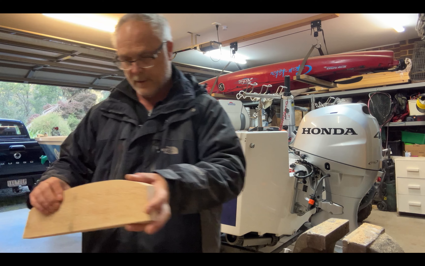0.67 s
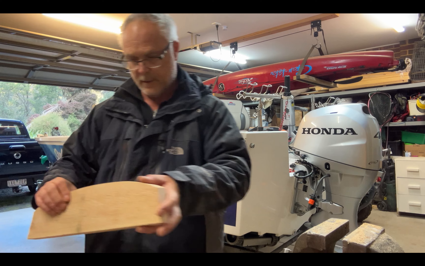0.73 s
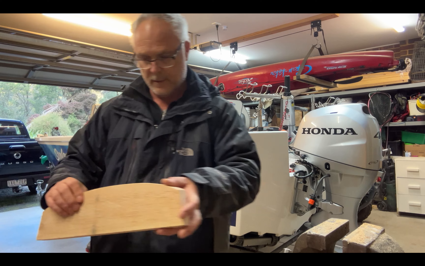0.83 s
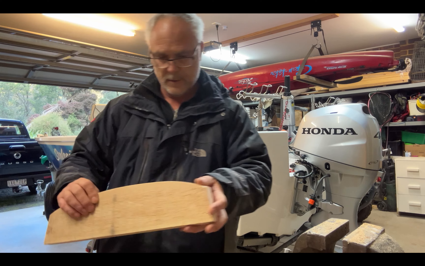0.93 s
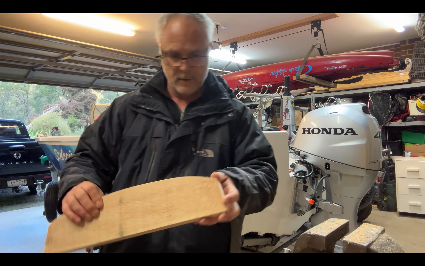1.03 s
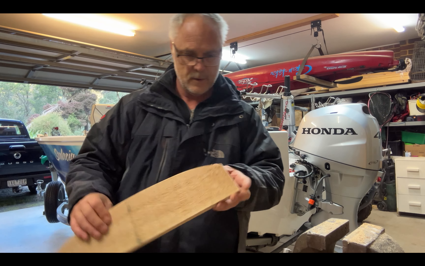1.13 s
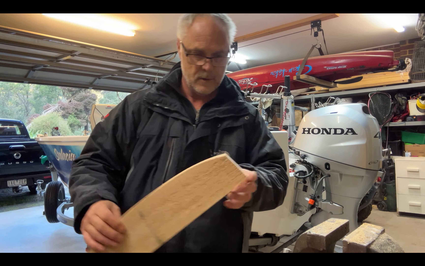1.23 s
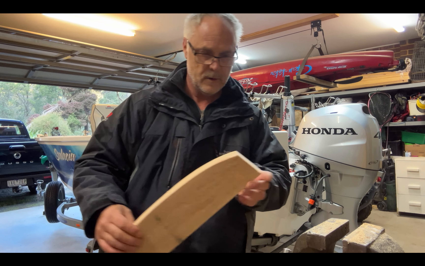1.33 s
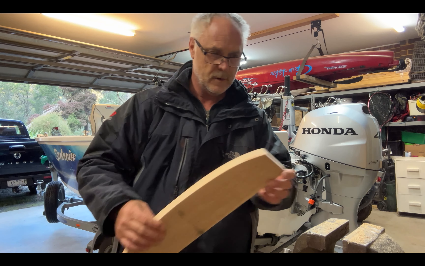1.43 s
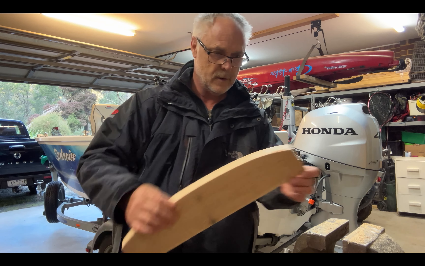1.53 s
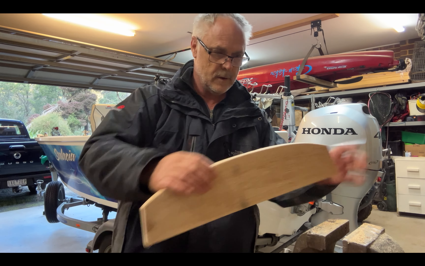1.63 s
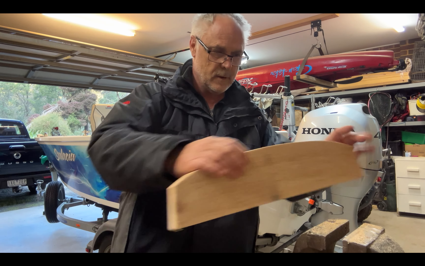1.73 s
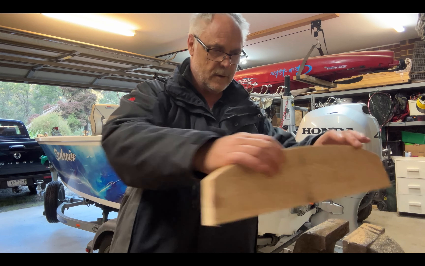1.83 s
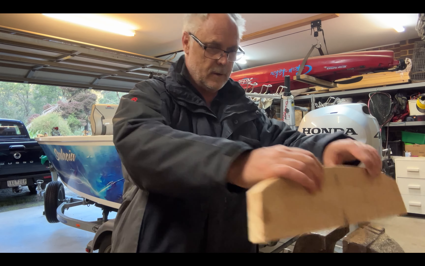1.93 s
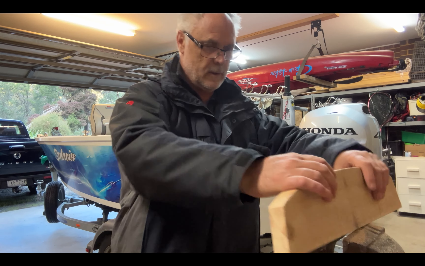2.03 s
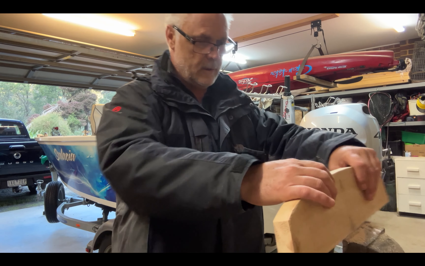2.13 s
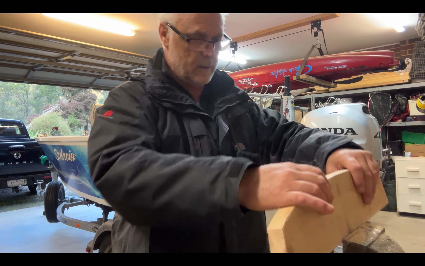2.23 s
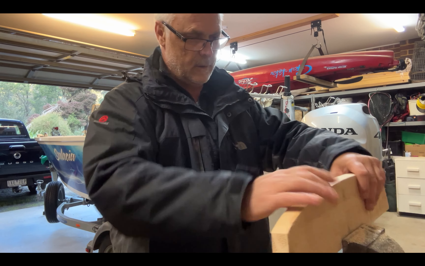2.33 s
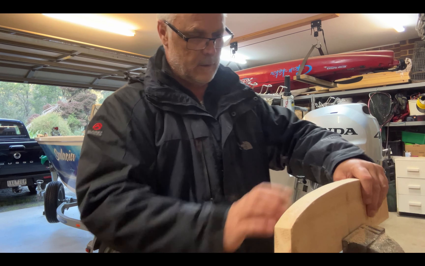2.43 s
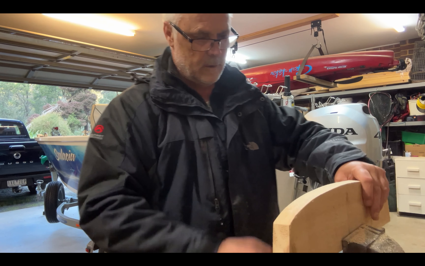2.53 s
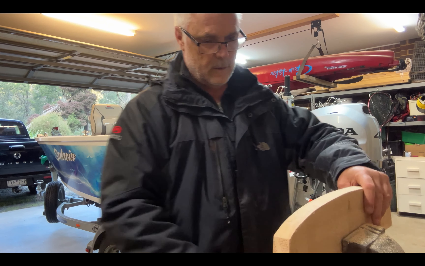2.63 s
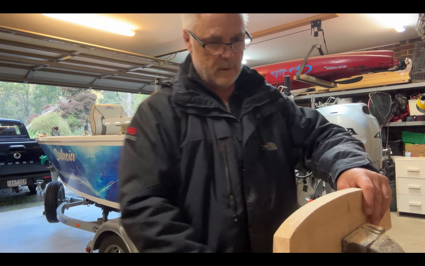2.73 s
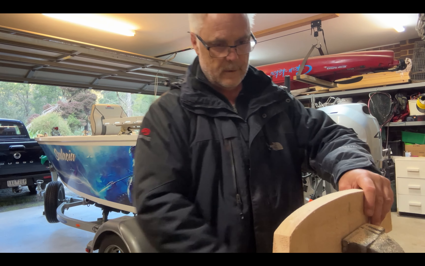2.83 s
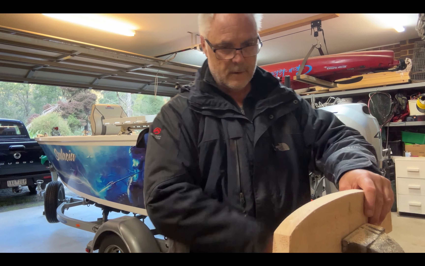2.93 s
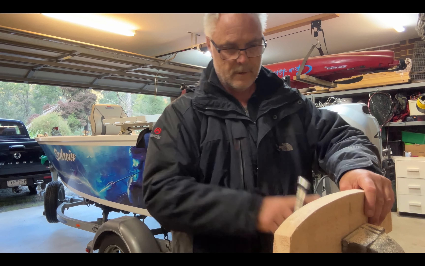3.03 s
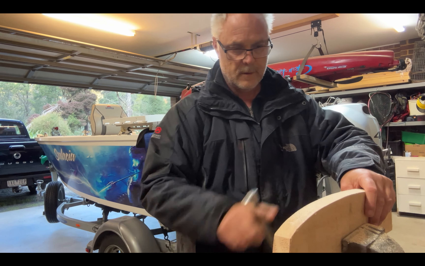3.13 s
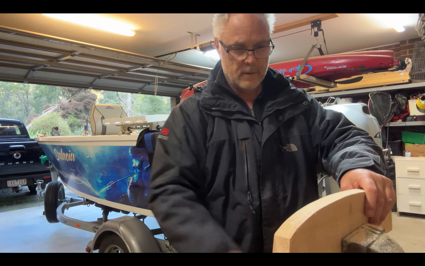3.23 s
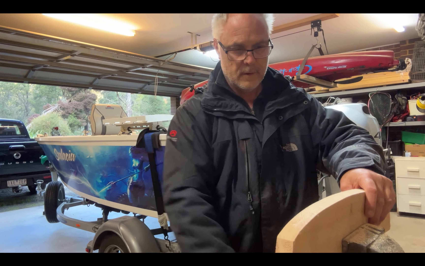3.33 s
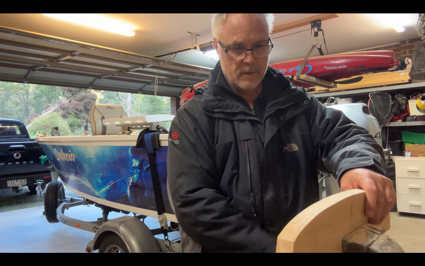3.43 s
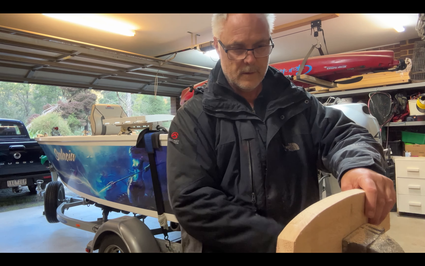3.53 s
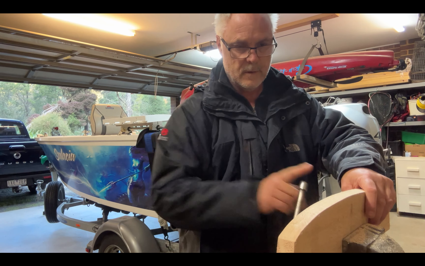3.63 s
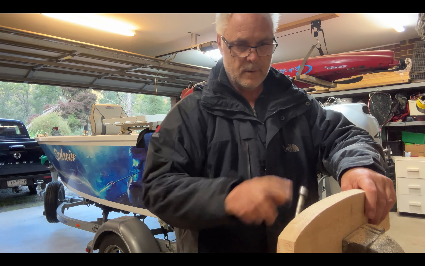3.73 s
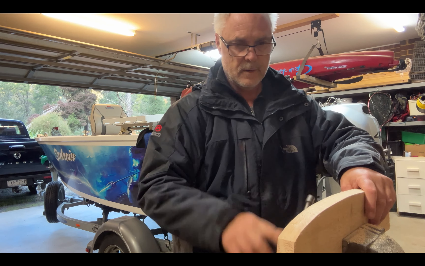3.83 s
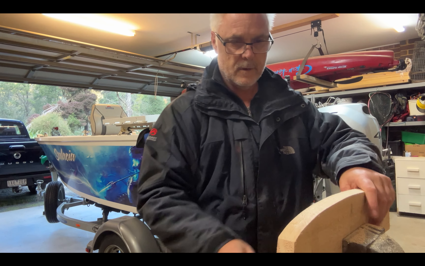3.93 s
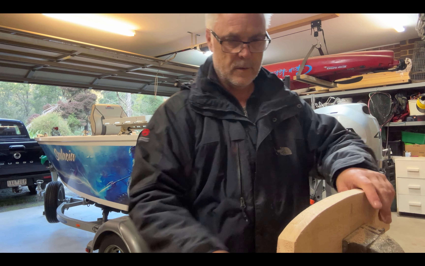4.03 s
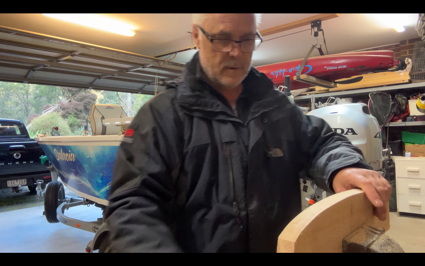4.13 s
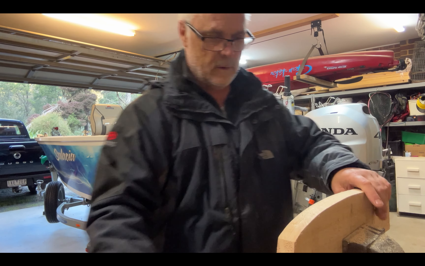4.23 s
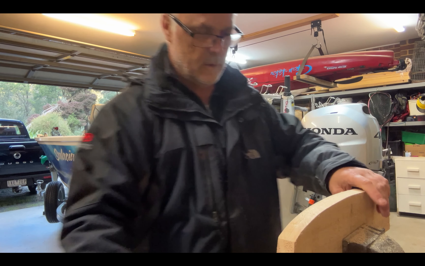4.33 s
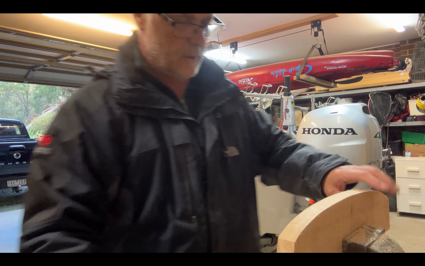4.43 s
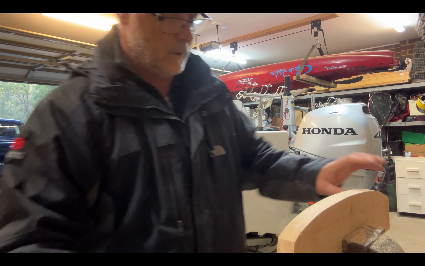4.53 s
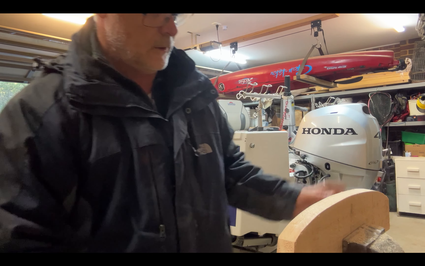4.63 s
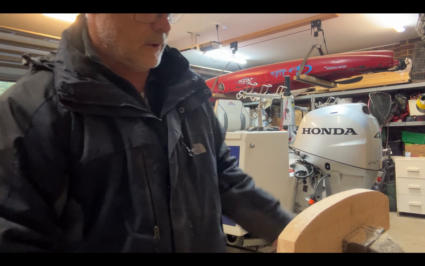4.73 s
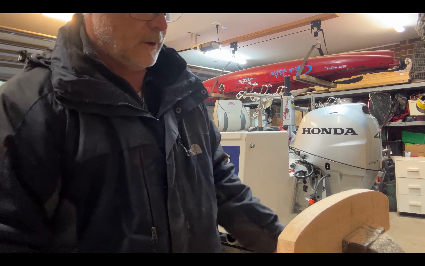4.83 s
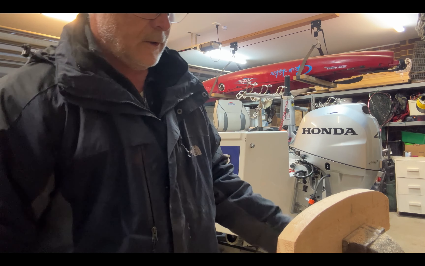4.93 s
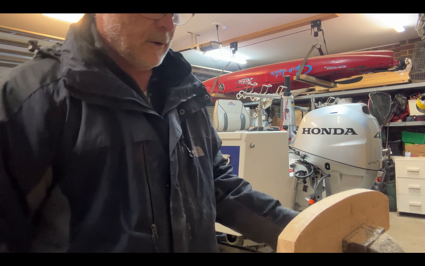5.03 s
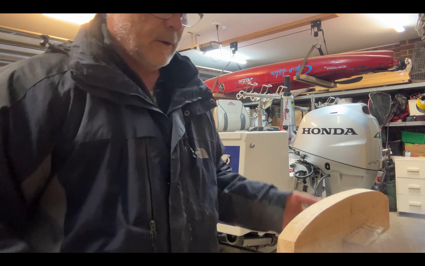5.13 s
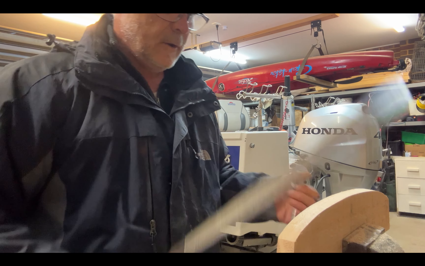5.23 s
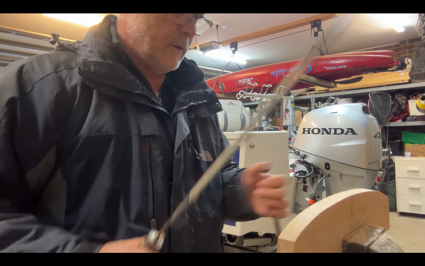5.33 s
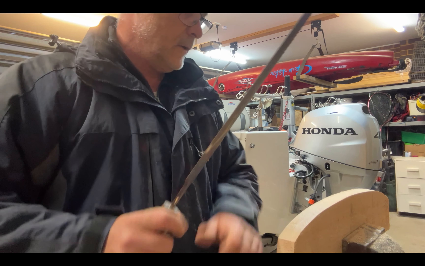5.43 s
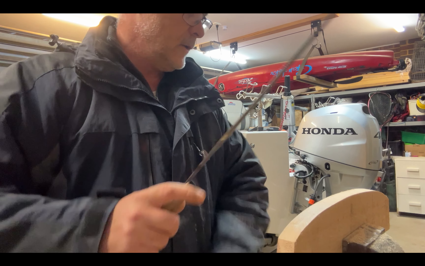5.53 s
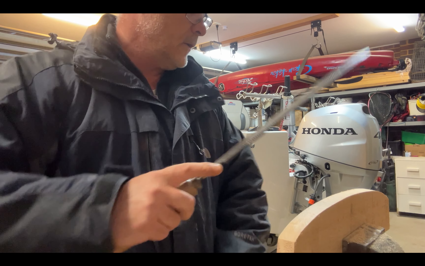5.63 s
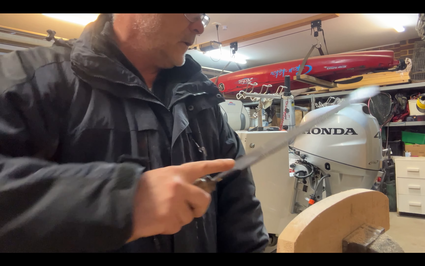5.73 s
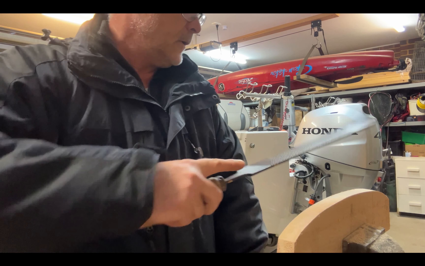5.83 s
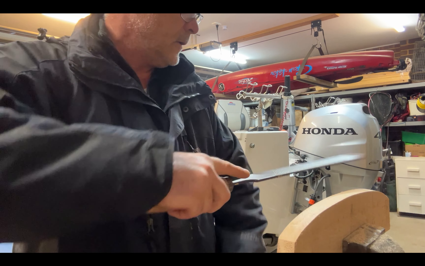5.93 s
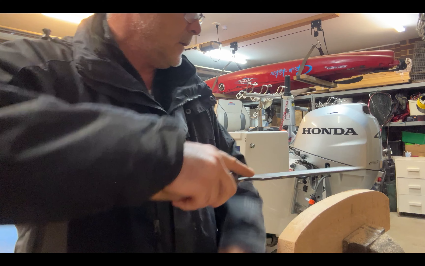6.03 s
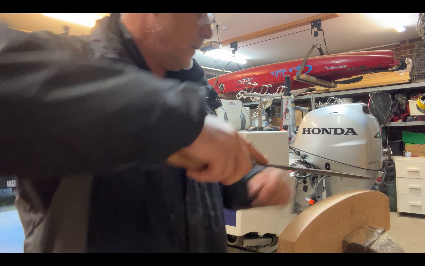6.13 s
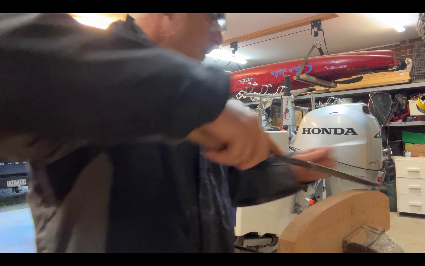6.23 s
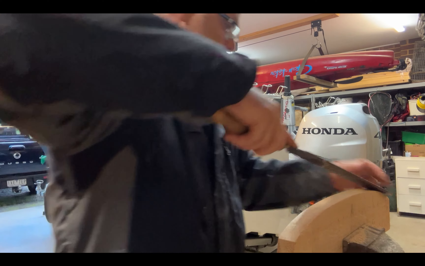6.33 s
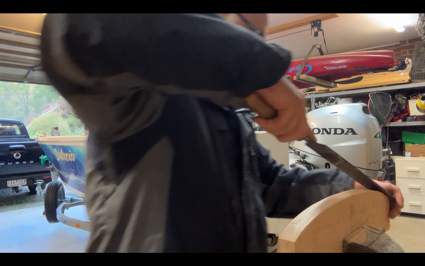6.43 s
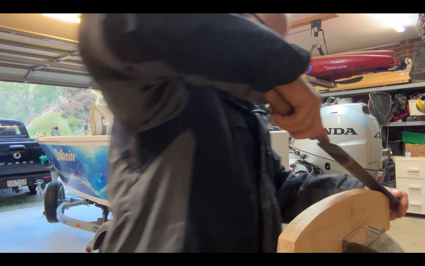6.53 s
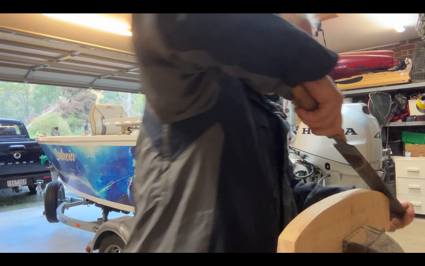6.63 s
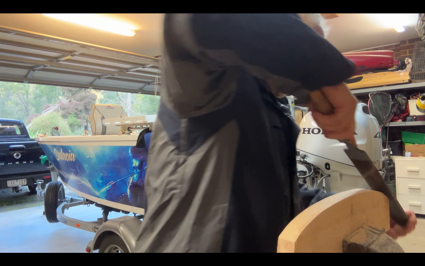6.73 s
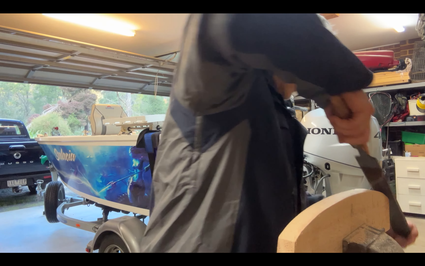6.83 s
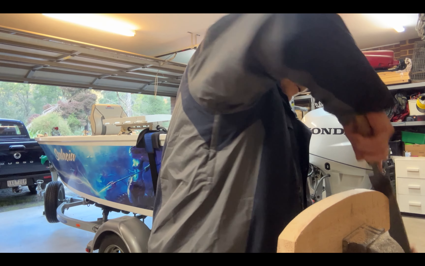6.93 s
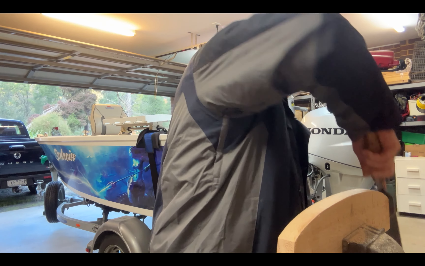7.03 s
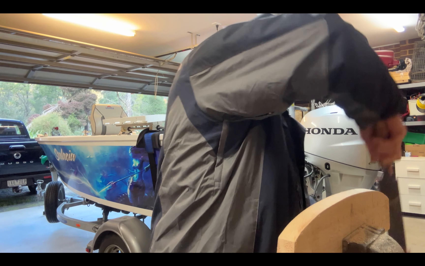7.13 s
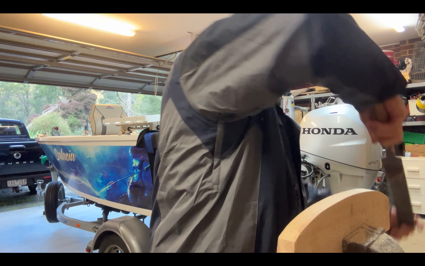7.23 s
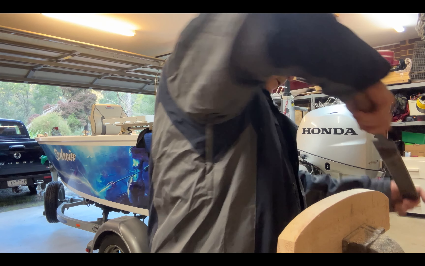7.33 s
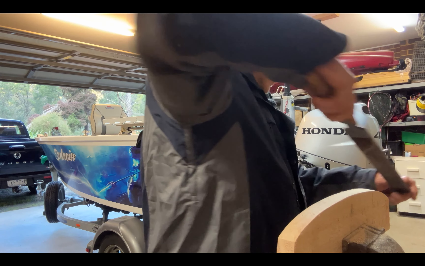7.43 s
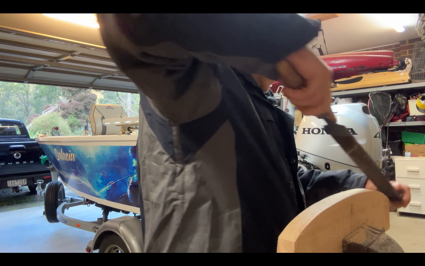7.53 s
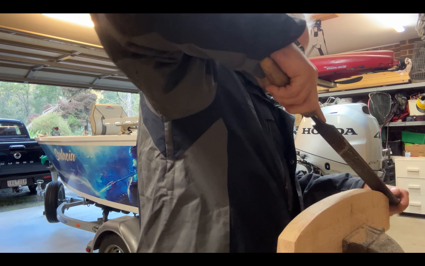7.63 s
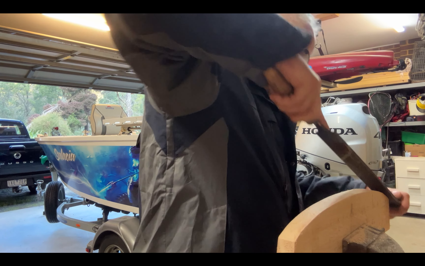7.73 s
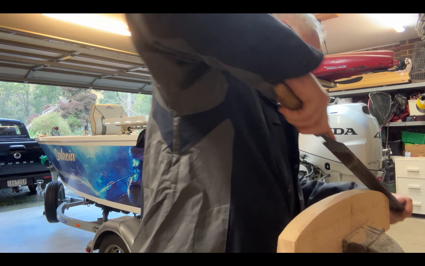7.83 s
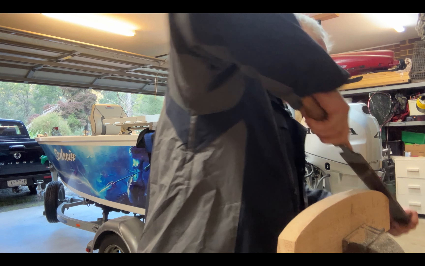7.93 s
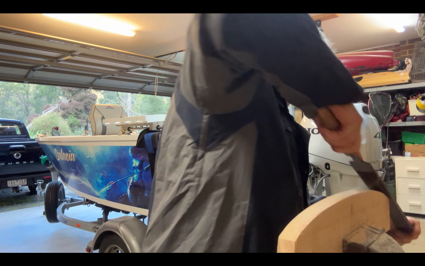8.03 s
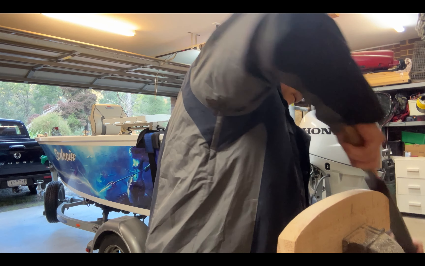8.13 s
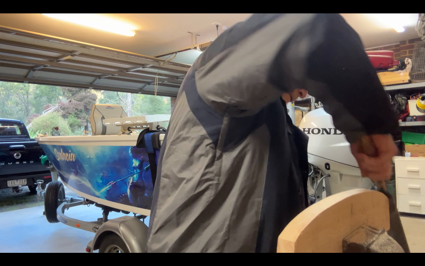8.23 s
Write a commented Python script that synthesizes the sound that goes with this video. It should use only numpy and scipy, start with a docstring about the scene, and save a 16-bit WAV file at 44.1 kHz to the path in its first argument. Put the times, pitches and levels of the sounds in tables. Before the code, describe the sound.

A timber board clacks into a steel vise with a ringing clank, screw thumps and clinks follow, then two harsh file strokes rasp along wood.

```python
"""In a garage a man in a nylon jacket, hissing and rustling as he moves, slides his palm along a curved board.
The board lands in a bench vise with a clack and a bounce; the slack jaw clanks, the screw thumps as it is
wound, steel clinks and the jolted bench booms. With a coarse file he then makes two strokes along the edge:
snags excite resonances of the clamped board, snapping fibres crackle and ring the blade, and the file judders.
Noise, clicks and short blows drive the resonators; most sources get a garage tail, over faint steady air."""
import sys
import numpy as np
from scipy import signal
from scipy.fft import rfft, irfft, next_fast_len
from scipy.io import wavfile
from scipy.ndimage import uniform_filter1d, map_coordinates

SR = 44100
rng = np.random.default_rng(int(sys.argv[2]) if len(sys.argv) > 2 else 0)


def master(y):
    """Save y as 16-bit WAV."""
    cut = np.clip(np.atleast_2d(y).T, -1, 1)
    pcm = np.round(cut * 32767)  # scale
    wavfile.write(sys.argv[1], SR, pcm.astype(np.int16))


N = 365588
TIME = np.arange(N) / SR


def from_db(db):
    """Decibels to gain."""
    return np.exp(np.log(10) / 20 * np.asarray(db))


def rms_one(x):
    """Scale to an rms of 1."""
    return x / np.sqrt(np.mean(x ** 2) + 1e-20)


def at_peak(sound, db):
    """Scale a single hit so that its peak has this level."""
    return from_db(db) * sound / np.abs(sound).max()


def bandpass(x, order, low_hz, high_hz):
    """Keep the band between two frequencies."""
    return signal.sosfilt(signal.butter(order, [low_hz, high_hz], "band", fs=SR, output="sos"), x)


def lowpass(x, order, top_hz):
    """Take the treble off."""
    return signal.sosfilt(signal.butter(order, top_hz, fs=SR, output="sos"), x)


def at_hz(points, hz):
    """Read a table on a log-frequency axis."""
    f, value = np.transpose(points)
    return np.interp(np.log(hz + 1), np.log(f), value)


def colour(x, spectrum):
    """Give a steady texture a spectrum; rms 1."""
    size = next_fast_len(N)
    hz = np.fft.rfftfreq(size, 1 / SR)
    beyond_last = np.minimum(1, spectrum[-1][0] / (hz + 1))
    shape = from_db(at_hz(spectrum, hz)) * beyond_last
    return rms_one(irfft(rfft(x, size) * shape, size)[..., :N])


def drift(per_s):
    """Smooth chance, with an rms of 1 and this many random turns per second."""
    knots = rng.standard_normal(N // 16)
    return rms_one(np.interp(TIME * per_s, np.arange(len(knots)), knots))


def resonate(x, modes):
    """Parallel resonances of alternating sign."""
    out = 0
    for k, (hz, width, db) in enumerate(modes):
        r = np.exp(-np.pi * width / SR)
        rung = signal.lfilter([1, 0, -1], [1, -2 * r * np.cos(2 * np.pi * hz / SR), r * r], x + 1e-18)
        out = out + rung * (1 - r * r) / 2 * from_db(db) * (-1) ** k
    return out


def grains(per_s, spread_db):
    """Random clicks of either sign; at a spread of 0 dB all are equally big."""
    sizes = from_db(spread_db * np.minimum(rng.exponential(1, N), 4)) * rng.choice([-1, 1], N)
    return sizes * (rng.random(N) < per_s / SR)


def rattle(length_s):
    """A blow that breaks up into a dying buzz of tiny contacts, about equally strong at all frequencies."""
    t = TIME[:SR // 3]
    buzz = rng.standard_normal(len(t)) * np.exp(-t / length_s)
    for _ in range(4):   # flatten the spectrum, then keep the buzz short
        spectrum = rfft(buzz)
        flat = irfft(spectrum / (np.abs(spectrum) + 1e-12), len(t))
        buzz = flat * np.exp(-(t / length_s / 10) ** 2)
    return buzz


def add(track, s, sound):
    """Mix a sound into a track at a time."""
    start = max(round(s * SR), 0)
    track[..., start:start + sound.shape[-1]] += sound[..., :N - start]


def wide(likeness):
    """White noise in two partly alike channels."""
    mid, side = rng.standard_normal((2, N))
    return np.sqrt(1 + likeness) * mid + np.sqrt(1 - likeness) * side * [[1], [-1]]


def detune(x, share, per_s):
    """Changing pressure and contact point pull all resonances up and down a little."""
    clock = TIME + np.cumsum(share * drift(per_s)) / SR
    return np.array([map_coordinates(channel, [clock * SR], order=1, mode="mirror") for channel in x])


def swell(s, spread):
    """A movement speeds up and slows down again: a bell in time, 1 on top."""
    return np.exp(-.5 * np.minimum(((TIME - s) / spread) ** 2, 60))


def swells(rows):
    """Gain of overlapping movements (s, spread s, dB); their powers add."""
    return np.sqrt(sum((from_db(db) * swell(s, spread)) ** 2 for s, spread, db in rows))


def held(start, end, rise_s, fall_db_per_s):
    """Attack, hold and a steady fall in dB."""
    return np.clip((TIME - start) / rise_s, 0, 1) * from_db(-fall_db_per_s * np.maximum(TIME - end, 0))


# The two file strokes. Each row: start in seconds, end in seconds, final effort in dB, swell in dB per second,
# time to bite in seconds, extra board shudder in dB.
FILE_STROKES = [(6.301, 7.02, -0.5, 39.5, 0.0056, 5), (7.729, 8.22, -0.5, 15, 0.16, 8.5)]


def effort(fall_db_per_s, build=1):
    """The file bites, is pushed ever harder to the end of each stroke and lets go; one gain curve per stroke."""
    curves = []
    for start, end, db, swell_db_per_s, bite_s, _ in FILE_STROKES:
        push = from_db(db - swell_db_per_s * np.maximum(end - TIME, 0))
        curves.append(push * held(start, end, build * bite_s, fall_db_per_s))
    return np.array(curves)


# Garage reverberation. Each row: frequency in Hz, time to fall by 60 dB in seconds.
GARAGE_DECAY = [(60, 0.54), (150, 0.58), (500, 0.5), (1500, 0.26), (3500, 0.33), (10000, 0.28)]


def garage(x, lag_s, pan_db, wet_db):
    """Direct sound, later on the left by lag_s, plus a diffuse tail whose bass lasts longest; pan_db > 0 is left."""
    x = np.broadcast_to(x, (2, N))
    t = TIME[:SR * 2 // 3]
    edges = np.geomspace(40, 18000, 10)
    tail = 0
    for low, high in zip(edges, edges[1:]):
        hz = np.sqrt(low * high)
        mid, side = rng.standard_normal((2, len(t)))
        noise = mid + min(1, hz / 600) * side * np.array([[1], [-1]])   # long waves reach both sides alike
        band = bandpass(noise, 2, low, high)
        decay = from_db(-60 * t / at_hz(GARAGE_DECAY, hz)) * (t > .003)
        tail = tail + band * decay / np.linalg.norm(decay) / noise.std()
    direct = np.array([np.interp(TIME - lag_s, TIME, x[0]), x[1]])
    heard = direct + from_db(wet_db) * signal.oaconvolve(x, tail, axes=1)[:, :N]
    return heard * from_db([[pan_db / 2], [-pan_db / 2]]) / np.hypot(1, from_db(wet_db))


# Spectrum of the open garage's air. Each row: frequency in Hz, relative level in dB.
AIR_SPECTRUM = [(25, -13), (65, 11.5), (120, 2), (250, -4.5), (500, -5.5), (900, -7), (1600, -5.5),
                (3000, -12.5), (7000, -17), (10500, -27), (13000, -23), (14000, -60)]


def air(level_db=-62):
    """The faint air of the garage: steady wide noise, strongest in the bass."""
    return from_db(level_db) * colour(wide(0.53), AIR_SPECTRUM)


# The whole bench jolted on its legs. Each row: time in seconds, relative boom level in dB, boom pitch in Hz,
# relative drumming level of its top in dB.
BENCH_JOLTS = [(2.014, -26, 74, -35.5), (2.224, -24, 67.4, -44.5), (2.715, -28, 70.3, -48.5),
               (3.036, -26.5, 58.6, -46.5), (3.358, -42, 57.6, -49.5), (3.785, -57, 59.6, -55),
               (4.938, -32.5, 54.4, -50), (5.277, -32.5, 144, -54.5), (5.501, -30.5, 59.4, -50),
               (6.004, -46, 66.6, -51.5), (7.652, -31.5, 60.5, -45), (8.265, -26, 62, -33)]
# He leans on the bench. Each row: start in seconds, end in seconds, level in dB.
BENCH_LEANING = [(2.067, 3.81, -40.5), (4.628, 7.533, -46.5)]
# Spectra of the swaying frame and the drumming top. Each row: frequency in Hz, relative level in dB.
SWAY_SPECTRUM = [(15, -60), (26, -31), (36, -7), (48, -6.5), (55, -3), (63, -4), (73, 1.5), (92, -12.5),
                 (130, -9.5), (250, -20.5)]
DRUM_SPECTRUM = [(70, -23.5), (110, -14), (148, -4.5), (175, -13), (230, -26.5), (400, -22), (800, -73)]
JOLT_RISE_S = 0.015
DRUM_DECAY_DB_PER_S = 121
SWAY_PER_JOLT_DB, SWAY_DECAY_DB_PER_S = -11, 57   # the frame sways on after every jolt
SWAY_FILING_DB = -27.5   # and in step with the filing effort
SETTLE_DB_PER_S = 62


def bench(drum_db=19.0):
    """Jolts, filing and his weight make the bench sway on its frame; each jolt also sets its top drumming."""
    pushes = [from_db(SWAY_FILING_DB) * effort(SETTLE_DB_PER_S).sum(axis=0)]
    for start, end, db in BENCH_LEANING:
        pushes.append(from_db(db) * held(start, end, JOLT_RISE_S, SETTLE_DB_PER_S))
    drumming = 0
    for s, boom_db, _, top_db in BENCH_JOLTS:
        pushes.append(from_db(boom_db + SWAY_PER_JOLT_DB) * held(s, s, JOLT_RISE_S, SWAY_DECAY_DB_PER_S))
        drumming = drumming + from_db(top_db) * held(s, s, JOLT_RISE_S, DRUM_DECAY_DB_PER_S)
    sway = np.linalg.norm(pushes, axis=0) * colour(wide(0.92), SWAY_SPECTRUM)
    drum = from_db(drum_db) * drumming * colour(wide(0.74), DRUM_SPECTRUM)
    return (sway + drum) * from_db([[-1.4], [1.4]])


def jolts(level_db=5.0, t60_s=0.57, rise_s=0.0014):
    """A heavy push rocks the bench, which booms briefly: one decaying sine per jolt."""
    out, t = np.zeros(N), TIME[:SR]
    for s, db, hz, _ in BENCH_JOLTS:
        decay = from_db(db + level_db - 60 * t / t60_s)
        add(out, s, decay * (1 - np.exp(-t / rise_s)) * np.sin(2 * np.pi * hz * t))
    return out * from_db([[-1.5], [1.5]])


# Arm movements in the jacket. Each row: fastest moment in seconds, spread in seconds, relative swish in dB,
# relative fold rustle in dB.
SLEEVE_MOVES = [(0.1, 0.19, -61.5, -60), (0.69, 0.035, -67, -79), (1.08, 0.17, -66, -67.5),
                (1.8, 0.2, -62.5, -58.5), (2.27, 0.16, -67, -50), (2.62, 0.077, -53, -46),
                (2.85, 0.082, -55, -56), (3.015, 0.061, -45.5, -42), (3.42, 0.14, -58.5, -53),
                (3.645, 0.05, -43, -45.5), (4.03, 0.49, -69, -61.5), (4.751, 0.2, -65.5, -57.5),
                (5.03, 0.19, -59, -56.5), (5.471, 0.14, -50.5, -49.5), (5.574, 0.046, -39, -47),
                (5.749, 0.037, -39.5, -46.5), (6.018, 0.15, -56.5, -53), (6.28, 0.11, -64, -56.5),
                (7.46, 0.18, -65, -52.5), (7.65, 0.12, -51, -50.5)]
# Spectra of the hissing threads and the rustling folds. Each row: frequency in Hz, relative level in dB.
SWISH_SPECTRUM = [(1000, -7.5), (2300, -1.5), (3500, 2), (5000, 2.5), (7000, -5.5), (9500, -1.5),
                  (11500, -3), (13000, -1.5), (13700, -27), (15000, -48.5)]
FOLD_SPECTRUM = [(90, -24.5), (170, -1.5), (400, 2), (700, -1.5), (1100, -3), (1800, -5.5), (2800, -11),
                 (5000, -12.5)]


def jacket(swish_db=7.0, folds_db=6.0, crinkle_db=1.9, snaps_db=-4):
    """Nylon threads slip over each other in a hiss and creases snap, while the folds rustle lower down."""
    swish = swells((s, spread, db) for s, spread, db, _ in SLEEVE_MOVES)
    folds = swells((s, spread, db) for s, spread, _, db in SLEEVE_MOVES)
    crinkle = from_db(crinkle_db * drift(70))
    slips = rms_one(crinkle * grains(per_s=33000, spread_db=-3.5))
    snaps = from_db(snaps_db) * rms_one(crinkle * grains(per_s=350, spread_db=2.5))
    threads = from_db(swish_db) * swish * colour(slips + snaps, SWISH_SPECTRUM)
    cloth = from_db(folds_db) * folds * colour(crinkle * wide(0.13), FOLD_SPECTRUM)
    return garage(threads, lag_s=.000113, pan_db=-1.4, wet_db=-7) + cloth * from_db([[-1], [1]])


# Shoes, sleeves and the file scuffing. Each row: middle in seconds, relative level in dB, centre in Hz,
# spread in seconds.
SCUFF_SLIDES = [(0.06, -53, 2350, 0.064), (0.088, -43.5, 570, 0.0042), (2.59, -41, 1300, 0.01),
                (3.574, -49.5, 1610, 0.079), (4.893, -59.5, 1590, 0.26), (5.189, -43.5, 820, 0.017),
                (5.51, -38, 2360, 0.029), (5.521, -33.5, 1130, 0.0034), (5.569, -34, 2300, 0.0048),
                (5.612, -41, 1640, 0.012), (5.951, -44, 1420, 0.024), (6.034, -43, 3520, 0.0068),
                (7.655, -42, 7600, 0.0054), (7.812, -34, 7500, 0.0024), (7.872, -54, 8000, 0.004),
                (8.228, -24, 7950, 0.0057)]


def scuffs(width_share=0.37):
    """Short gritty slides, each swelling and fading in one broad band."""
    grit = grains(per_s=5100, spread_db=1.5)
    out = 0
    for s, db, hz, spread in SCUFF_SLIDES:
        narrowed = resonate(grit, [(hz, width_share * hz, 0)])
        scrape = rms_one(resonate(narrowed, [(hz, hz, 0)]))
        out = out + from_db(db) * swell(s, spread) * scrape
    return garage(out, lag_s=.0001, pan_db=-0.5, wet_db=-5.0)


# Palm sliding along the free board. Each row: fastest moment in seconds, spread in seconds, relative level in dB.
PALM_SLIDES = [(0.8, 0.033, -70.5), (1.03, 0.084, -53), (1.195, 0.024, -38.5)]
# Board held in the hands. Each row: frequency in Hz, width in Hz, relative level in dB, extra dB per dB of
# sliding speed.
FREE_BOARD_MODES = [(595, 3.5, 0, -0.1), (1090, 75, -6.5, 1), (1514, 25, 1, -0.17), (2330, 120, -13, -0.5),
                    (2730, 52, -10, 0), (2960, 110, -8.5, -0.5), (4000, 160, -13.5, -2.5),
                    (4230, 160, -11.5, -0.5), (5040, 180, -14, -2), (5850, 130, -11, 0.5),
                    (7400, 150, -12, 3)]


def palm(steady_s=0.049):
    """Skin dragging over the grain keeps the free board singing; each mode grows with speed at its own rate."""
    drag, speed, song = grains(per_s=6200, spread_db=-2.5), swells(PALM_SLIDES), 0
    for hz, width, db, steepness in FREE_BOARD_MODES:
        mode = resonate(drag, [(hz, width, 0)])
        power = uniform_filter1d(mode ** 2, int(steady_s * SR))
        steady = mode / np.sqrt(np.abs(power) + 1e-12)
        song = song + from_db(db) * (speed / speed.max()) ** max(1 + steepness, .5) * steady
    return garage(speed.max() * song / 2, lag_s=-0.000067, pan_db=-2.0, wet_db=-8.0)


# Board clamped to the bench. Each row: frequency in Hz, width in Hz, relative level in dB, left minus right in dB.
CLAMPED_MODES = [(137.5, 31.5, -3, -5), (172.7, 38, 0.5, 1), (244.4, 25, -1, -6), (287.3, 6.4, 0, 10),
                 (346, 38, -2, -6.5), (399, 42, 0, 5), (460.2, 11.9, 4.5, -8), (561.7, 40, -2, 4),
                 (605, 52, -6, 0.5), (681, 20, -3.5, 1), (746, 14, -10, -8.5), (867, 27, -7.5, -8),
                 (1101, 29, -21, -28), (1451, 23, -11, 0), (1600, 150, -20, -2), (2050, 100, -22.5, 13),
                 (2730, 71, -39, 3), (2880, 170, -24, -2)]
WANDER_PER_S = 16   # how often the travelling contact favours other modes


def board(force, wander_db=0):
    """The clamped board in stereo: every mode radiates its own way, and waxes and wanes if the contact travels."""
    out = 0
    for k, (hz, width, db, pan) in enumerate(CLAMPED_MODES):
        mode = resonate(force, [(hz, width, db)]) * (-1) ** k
        if wander_db:
            mode = mode * from_db(wander_db * drift(WANDER_PER_S))
        out = out + mode * from_db([[pan / 2], [-pan / 2]])
    return out


# Knocks on the board. Each row: time in seconds, relative peak in dB, contact brightness in Hz,
# contact length in seconds.
BOARD_KNOCKS = [(0.09, -34, 1900, 0.002), (0.324, -40, 516, 0.0056), (2.216, -12, 1100, 0.0042),
                (3.027, -15, 497, 0.0027), (3.351, -16.5, 404, 0.0022), (3.466, -25.5, 1430, 0.011),
                (3.974, -40, 1210, 0.0044), (4.325, -39.5, 685, 0.027), (4.917, -26.5, 850, 0.025),
                (5.114, -31.5, 303, 0.0035), (5.414, -25.5, 537, 0.039), (5.523, -24.5, 700, 0.005),
                (5.951, -32, 302, 0.022), (6.088, -37.5, 194, 0.0029), (6.322, -19.5, 1000, 0.0022),
                (6.326, -7.5, 423, 0.01), (6.417, -17, 563, 0.027), (7.638, -13.5, 390, 0.0071),
                (7.764, -24, 1594, 0.0043), (7.805, -14.5, 710, 0.021), (8.267, -9, 1100, 0.008)]


def knocks(crack_db=-15, crunch=0.26, press_share=0.56, hard_s=0.023, bass_share=0.052):
    """A click and a short crunch ring the clamped board; longer contacts click less and set in gradually."""
    out, t = np.zeros((2, N)), TIME[:SR // 3]
    for s, db, bright_hz, length in BOARD_KNOCKS:
        force = crunch * rng.standard_normal(len(t)) * np.exp(-t / length)
        force *= 1 - np.exp(-t / (press_share * length))
        force[0] += np.exp(-length / hard_s)
        force = bandpass(force, 2, bass_share * bright_hz, bright_hz)
        add(out, s, at_peak(board(force) + from_db(crack_db) * force, db))
    return garage(out, lag_s=0.0001, pan_db=-3.0, wet_db=-8.0)


# Steel handle and tools clinking. Each row: time in seconds, relative peak in dB, pitch of the contact in Hz,
# free ring in dB, rattle in seconds.
STEEL_CLINKS = [(3.205, -37, 8000, -11, 0.00085), (3.28, -41, 9000, -18, 0.0034),
                (3.465, -19, 9550, -8, 0.0023), (3.783, -26, 2970, -6.5, 0.0035),
                (3.969, -38.5, 9600, -20, 0.0015), (4.154, -48, 5100, -15, 0.0034),
                (5.164, -39, 4000, -16, 0.0017), (5.182, -33.5, 3800, -14, 0.0019),
                (5.31, -41, 5030, -9, 0.003), (6.04, -41, 3500, -23, 0.0053)]
# Vise handle, damped by the hand. Each row: frequency in Hz, width in Hz, relative level in dB.
HANDLE_MODES = [(4660, 360, 2), (5950, 240, 0), (6500, 640, -3), (8400, 510, -18), (10600, 220, 1),
                (11000, 130, 0)]


def clinks(level_db=9.5, tick_db=-17, top_hz=14000):
    """Steel hits steel with a dry, even snap; a gripping hand keeps it from ringing long."""
    out = np.zeros(N)
    for s, db, contact_hz, ring_db, rattle_s in STEEL_CLINKS:
        force = bandpass(rattle(rattle_s), 1, contact_hz / 2, min(contact_hz * 2, SR / 3))
        force = lowpass(force, 4, top_hz)
        sound = from_db(ring_db) * resonate(force, HANDLE_MODES) + from_db(tick_db) * force
        add(out, s, at_peak(sound, db + level_db))
    return garage(out, lag_s=0.00012, pan_db=-1.0, wet_db=-5.0)


# The vise screw thumps as it is wound. Each row: time in seconds, relative peak in dB, contact brightness in Hz,
# contact length in seconds.
SCREW_THUMPS = [(2.31, -27, 900, .012), (2.432, -28.5, 1200, 0.0044), (2.693, -24.5, 1500, .004),
                (2.703, -26.5, 700, .003), (2.979, -20.5, 1200, .004), (3.028, -8, 1100, .004),
                (3.04, -9.5, 600, .004), (3.359, -19.5, 620, .005), (3.784, -23, 1600, .007),
                (3.799, -25.5, 1100, .007)]
# Cast body of the vise. Each row: frequency in Hz, width in Hz, relative level in dB.
VISE_MODES = [(370, 60, -1), (480, 70, 3), (630, 80, 1), (800, 80, 0), (1080, 113, -7), (1400, 140, -8),
              (1950, 200, -11)]


def thumps(crack_db=-14, low_hz=280):
    """The screw takes up its slack in short, hollow thumps through the cast body of the vise."""
    out = np.zeros(N)
    for s, db, bright_hz, length in SCREW_THUMPS:
        force = bandpass(rattle(length), 2, low_hz, max(bright_hz, low_hz * 2))
        add(out, s, at_peak(resonate(force, VISE_MODES) + from_db(crack_db) * force, db))
    return garage(out, lag_s=0.00015, pan_db=-2.5, wet_db=-6.0)


# Vise jaw. Each row: frequency in Hz, width in Hz, relative level in dB.
JAW_MODES = [(1390, 89, 4.5), (1546, 65, 5), (2100, 53, -4), (2695, 78, 10.5), (3040, 51, 3),
             (3280, 110, 1), (3770, 170, 2), (4210, 150, 4), (5800, 220, -16), (6250, 250, -1),
             (7467, 170, -31), (8500, 74, 0.5), (8880, 240, -5), (9700, 220, -2), (10150, 150, -4),
             (11300, 120, -12)]


def clank(at_s=2.2165, peak_db=-1, rattle_s=0.004, tick_db=-12, top_hz=10800):
    """The slack steel jaw slams against its screw, buzzes for a moment and rings through the garage."""
    out = np.zeros(N)
    force = lowpass(rattle(rattle_s), 4, top_hz)
    add(out, at_s, at_peak(resonate(force, JAW_MODES) + from_db(tick_db) * force, peak_db))
    return garage(out, lag_s=0.00011, pan_db=-1.0, wet_db=-4.5)


# Board dropped into the open vise, and its bounce. Each row: time in seconds, relative peak in dB,
# contact brightness in Hz.
BOARD_LANDINGS = [(2.006, -1, 2070), (2.076, -15, 2580)]
# Board meeting the open jaws. Each row: frequency in Hz, width in Hz, relative level in dB.
LANDED_MODES = [(142, 30, -7), (251, 26, 10.5), (350, 23, 16), (465, 43, 14.5), (540, 50, 9),
                (613, 75, 3.5), (750, 44, 0.5), (850, 39, 6.5), (1140, 73, -3.5), (1255, 90, -2),
                (1532, 59, 7.5), (1640, 110, -3), (1860, 78, 0), (2230, 80, -3.5), (2500, 90, -5),
                (2725, 110, -3), (3430, 78, -9), (4100, 200, -7), (4480, 160, -24), (5300, 360, -28)]


def landing(level_db=1.0, crack_db=-19, crunch=0.042, crunch_s=0.009):
    """Dry timber lands on the steel jaws with a bright clack and bounces once."""
    out, t = np.zeros(N), TIME[:SR // 3]
    for s, db, bright_hz in BOARD_LANDINGS:
        force = crunch * rng.standard_normal(len(t)) * np.exp(-t / crunch_s)
        force[0] += 1
        force = lowpass(force, 2, bright_hz * 2)
        add(out, s, at_peak(resonate(force, LANDED_MODES) + from_db(crack_db) * force, db + level_db))
    return garage(out, lag_s=0.00022, pan_db=-3.0, wet_db=-4.0)


# Grooves crossed per second, following the speed of the file. Each row: time in seconds, rate in Hz.
GROOVE_CROSSINGS = [(6.6, 147.3), (7.03, 130.2), (7.08, 160), (7.92, 145), (8.0, 164.5), (8.09, 169.9),
                    (8.15, 201.3), (8.19, 227)]


def grooves(waver=0.0601):
    """Phase of the teeth skipping from groove to groove at an unsteady rate."""
    rate_hz = np.interp(TIME, *np.transpose(GROOVE_CROSSINGS)) * (1 + waver * drift(90))
    return 2 * np.pi * np.cumsum(rate_hz) / SR


# Teeth falling into their own grooves. Each row: middle in seconds, spread in seconds, relative level in dB.
JUDDER_SPELLS = [(7.05, 0.035, -14.5), (7.96, 0.041, -19.5), (8.06, 0.043, -12.5), (8.152, 0.011, -13.5),
                 (8.19, 0.0082, -14)]


def judder(skip, flutter_db=-3.0, second_db=-18, third_db=-16):
    """Under full pressure the file skips from groove to groove in a rough low drone that follows its speed."""
    wave = np.sin(skip) + from_db(second_db) * np.sin(2 * skip) + from_db(third_db) * np.sin(3 * skip)
    drone = swells(JUDDER_SPELLS) * rms_one(wave * from_db(flutter_db * drift(60)))
    return garage(drone, lag_s=0.00055, pan_db=1.5, wet_db=-15)


# File blade, damped by both hands. Each row: frequency in Hz, width in Hz, relative level in dB.
BLADE_MODES = [(1158, 39, 25), (1480, 27, 21.5), (1962, 22, 12), (2190, 27, 21), (2415, 14, 12),
               (2522, 20, 19), (3430, 90, 2), (3900, 190, 6), (4080, 120, 7), (4960, 80, 7), (5680, 90, 11),
               (6470, 150, 9), (7420, 110, 4), (7800, 480, 9), (10400, 270, -9)]


def blade(force, wander_db=1.5, per_s=13):
    """The contact runs along the blade, so that each of its modes waxes, wanes and bends in pitch."""
    out = 0
    for mode in BLADE_MODES:
        bent = detune([resonate(force, [mode])], share=.012, per_s=11)[0]
        out = out + bent * from_db(wander_db * drift(per_s))
    return rms_one(out)


# Spectra of the rasping splinters and the tearing fibres. Each row: frequency in Hz, relative level in dB.
RASP_SPECTRUM = [(500, -53), (900, -4.5), (1400, -0.5), (2200, -17.5), (3200, -9.5), (4500, -16),
                 (8000, -42)]
TEARING_SPECTRUM = [(1500, -7), (3000, 6), (4200, 1.5), (5600, 13), (7100, 1.5), (8400, 6), (10500, 4.5),
                    (12300, 1), (13200, -65), (14000, -49)]
LIFT_DB_PER_S = 454   # the bite drops this fast as the file leaves the wood
SHUDDER_DECAY_DB_PER_S = 198   # the board shakes on a little
SHUDDER_BUILD = 4.7   # the board takes this many bite times to start shaking
SHUDDER_TOP_DB = -3   # ceiling of the shaking curve: beyond it the board shakes no harder
BREAKOUT_S, BREAKOUT_DB = 0.05, 2   # fibres tear louder at the very end of a stroke


def filing(skip, shudder_db=-12, rasp_db=-23, hiss_db=-26, blade_db=-1,
           chatter_db=1.0, lurch_db=1.45, groove_db=1.5):
    """Teeth catch and let go: snags shake the board, snapping fibres crackle and ring the blade."""
    push = effort(LIFT_DB_PER_S).sum(axis=0)
    stroke_gains = from_db([db for *_, db in FILE_STROKES])
    shaking = stroke_gains @ effort(SHUDDER_DECAY_DB_PER_S, SHUDDER_BUILD)
    shudder = np.minimum(shaking, from_db(SHUDDER_TOP_DB))
    endings = sum(swell(end - BREAKOUT_S / 2, BREAKOUT_S / 2) for _, end, *_ in FILE_STROKES)
    breakout = from_db(BREAKOUT_DB * endings)
    # All layers share the uneven grip.
    grip_db = chatter_db * drift(260) + lurch_db * drift(35) + groove_db * np.sin(skip)
    catch = rms_one(from_db(grip_db))
    shaken = board(catch * grains(per_s=5000, spread_db=0.0), wander_db=1.9)
    snags = rms_one(detune(shaken, share=.013, per_s=22))
    splinters = colour(catch * grains(per_s=1100, spread_db=5.5), RASP_SPECTRUM)
    fibres = catch * grains(per_s=5000, spread_db=6.0)
    tearing = colour(fibres, TEARING_SPECTRUM) + from_db(blade_db) * blade(fibres)
    body = garage(from_db(shudder_db) * shudder * snags, lag_s=0.00053, pan_db=-1.5, wet_db=-4.0)
    edge = push * (from_db(rasp_db) * splinters + from_db(hiss_db) * breakout * tearing)
    return body + garage(edge, lag_s=0.000462, pan_db=-1.5, wet_db=1.5)


def scene():
    """All the work, over the faint air of the open garage."""
    background = air() + bench() + jolts()
    handling = jacket() + scuffs() + palm() + knocks() + clinks() + thumps() + clank() + landing()
    skip = grooves()
    return background + handling + judder(skip) + filing(skip)


def record(dry):
    """Peaks stop at full scale, and the treble is cut steeply, 70 dB down from 16 kHz."""
    return signal.sosfilt(signal.cheby2(12, 70, 16000, fs=SR, output="sos"), np.clip(dry, -1, 1))


dry = scene()
out = record(dry)
master(out)
```